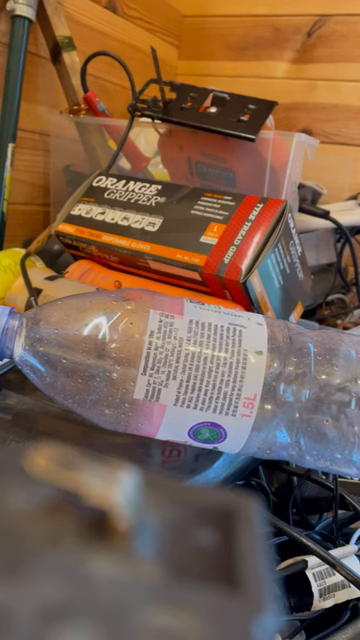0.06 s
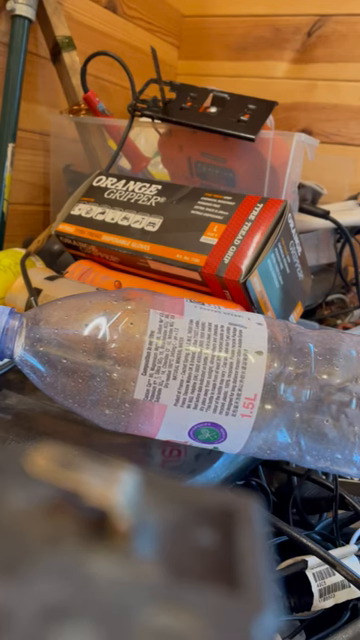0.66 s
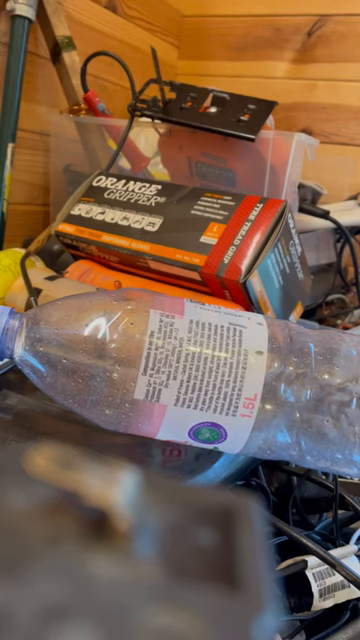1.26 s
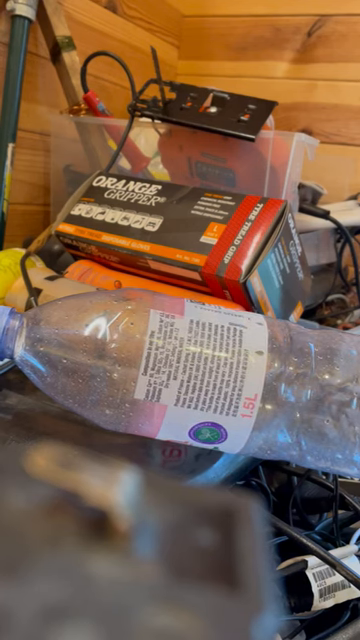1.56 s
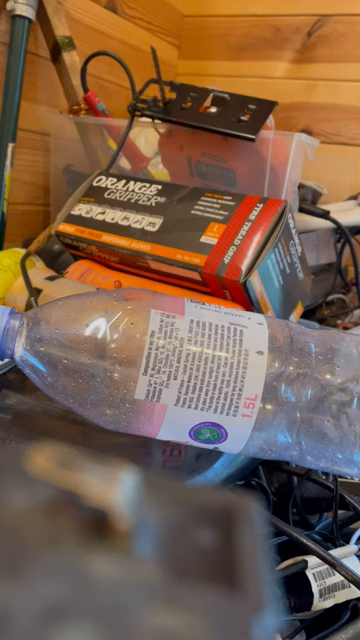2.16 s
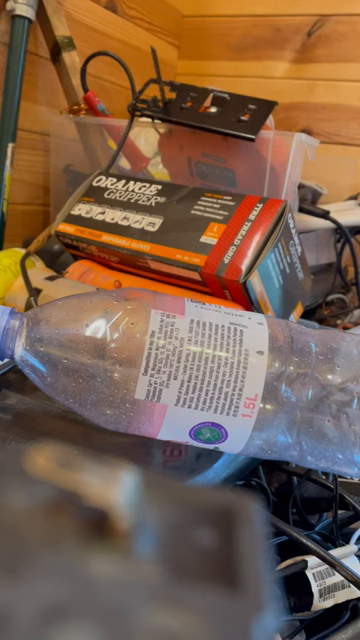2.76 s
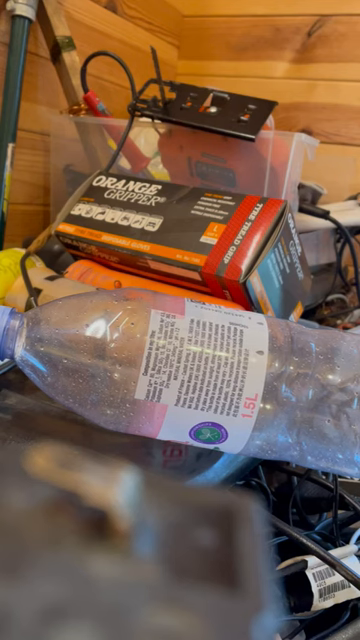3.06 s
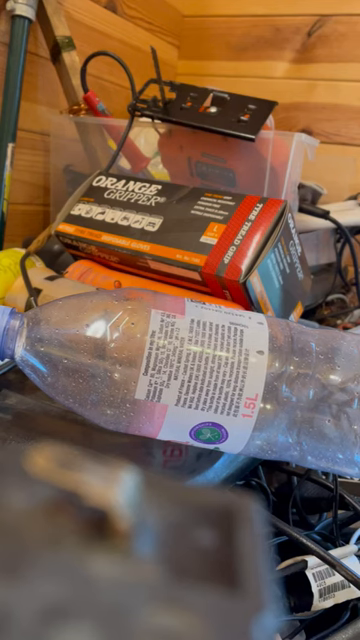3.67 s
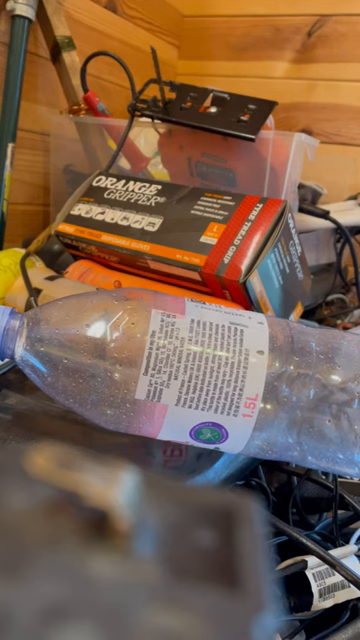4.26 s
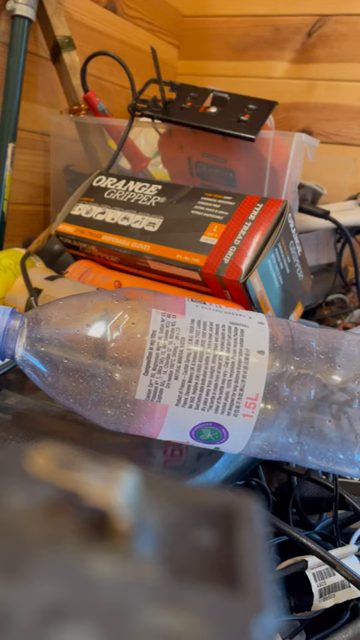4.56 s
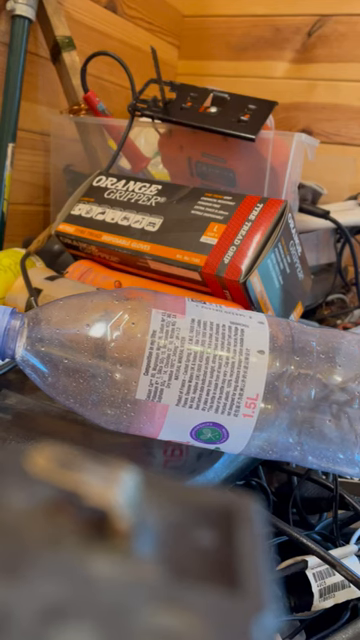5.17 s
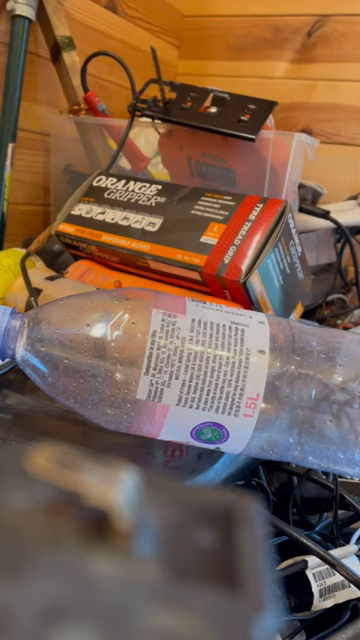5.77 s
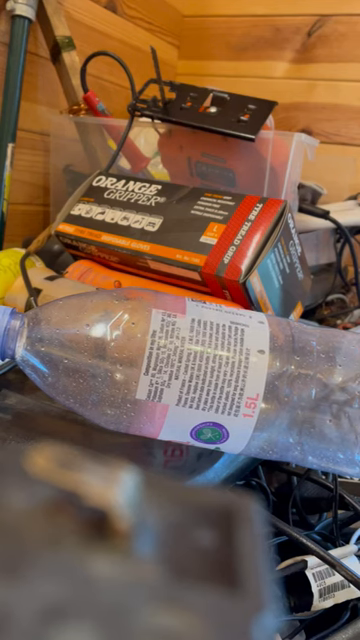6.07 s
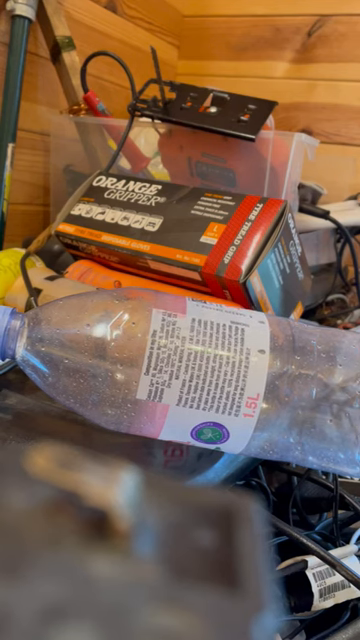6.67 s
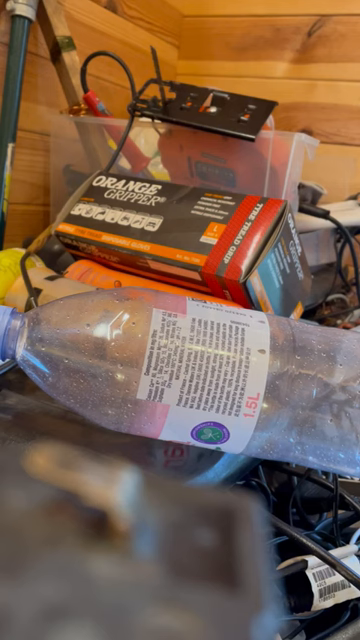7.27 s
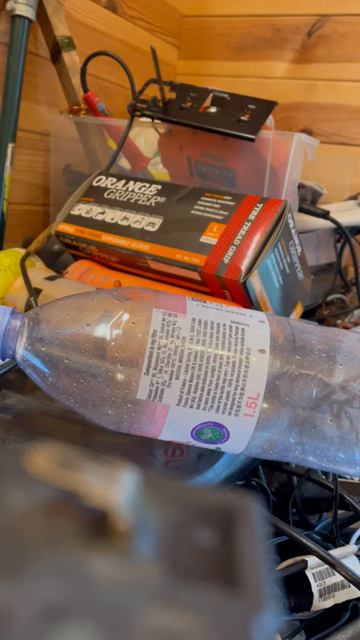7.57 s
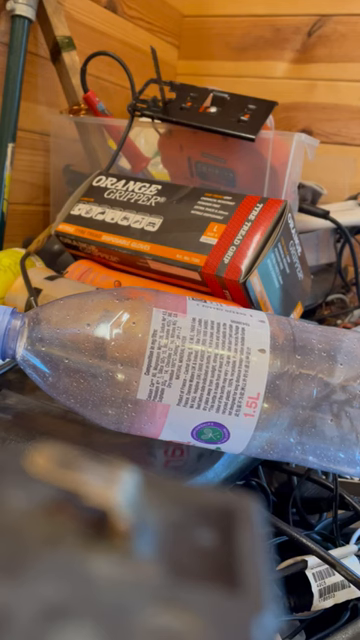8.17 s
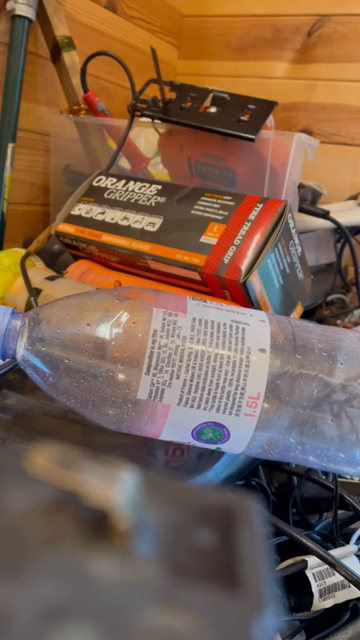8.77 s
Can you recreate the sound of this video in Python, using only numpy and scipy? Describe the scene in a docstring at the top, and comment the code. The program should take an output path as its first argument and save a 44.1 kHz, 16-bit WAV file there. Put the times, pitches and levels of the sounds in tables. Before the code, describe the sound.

A small compressor hums steadily with hissing air and a fine metallic rattle that eases as it pumps into a plastic bottle.

```python
"""Fridge compressor filling a bottle

A fridge compressor on a shed bench pumps air into a plastic bottle. Each piston stroke
thumps the casing and lets a spit of air through the fluttering valve, while loose parts chatter.
As the pressure builds the motor slows, the rush of air fades, and overtones slide into
the casing's narrow resonances and sing."""
import sys
import numpy as np
from scipy import signal
from scipy.fft import rfft, irfft, next_fast_len
from scipy.io import wavfile
from scipy.ndimage import uniform_filter1d, map_coordinates

SR = 44100
rng = np.random.default_rng(int(sys.argv[2]) if len(sys.argv) > 2 else 0)


def digitize_waveform(pressure):
    """Quantize a signal to 16-bit integers and store it at the path in sys.argv[1].

    Rows of a 2-D input are taken as channels; values are limited to [-1, 1].
    """
    field = np.atleast_2d(pressure).T
    bounded = np.clip(field, -1, 1)
    quanta = np.round(bounded * 32767).astype(np.int16)
    wavfile.write(sys.argv[1], SR, quanta)


N = 398223
TIME = np.arange(N) / SR
SIZE = next_fast_len(N + 8192, real=True)  # spare room for rings to die away
FREQ = np.maximum(np.arange(SIZE // 2 + 1) * SR / SIZE, 1)
FREE_HZ = 48.615  # motor turns per second while the bottle is empty


def undb(db):
    """Turn decibels into a number to multiply by."""
    return 10 ** (np.asarray(db) / 20)


def across(points):
    """Join (frequency, value) points into a curve over all frequencies."""
    hz, value = np.transpose(points)
    return np.interp(np.log(FREQ), np.log(hz), value)


def unit(x):
    """Scale a signal to an average power of 1."""
    return x / np.sqrt(np.mean(x ** 2))


def wander(rate_hz):
    """A smooth random wobble, about 1 in size."""
    hold = int(SR / rate_hz)
    steps = np.repeat(rng.standard_normal(N // hold + 1), hold)
    return unit(uniform_filter1d(steps, hold)[:N])


def ringing_filter(db):
    """A filter with these levels that rings only after it is struck."""
    cepstrum = irfft(np.log(undb(db)), SIZE)
    cepstrum[1:SIZE // 2] *= 2
    cepstrum[SIZE // 2 + 1:] = 0
    return np.exp(rfft(cepstrum))


def body(colour, rings=()):
    """An object as a filter: a broad tone colour plus peaks where it likes to ring."""
    peaks = sum((undb(db) ** 2 - 1) / (1 + (2 * (FREQ - hz) / width) ** 2) for hz, width, db in rings)
    return ringing_filter(across(colour) + 10 * np.log10(1 + peaks))


def opening(crank, position, half_length):
    """A smooth pulse once a turn; all three inputs are counted in turns."""
    distance = (crank - position + .5) % 1 - .5
    return np.exp(-(distance / half_length) ** 2)


# How far the left side runs ahead of the right: (frequency [Hz], lead [radians])
LEFT_LEAD = [(50, 0), (300, 0.42), (550, -1.56), (680, -0.84), (800, -3.5), (1000, 0.27), (2300, 0.11),
             (3600, 1.87), (4400, 0.5), (4900, 0.43), (6200, 1.61), (7000, 3), (8000, 3.5), (9000, 4),
             (9800, 8), (11600, 6.5), (12500, 8.5), (13200, 5), (14300, 8), (15000, 10)]

def stereo(spectrum):
    """Sound reaches the left and right microphones a little apart."""
    return irfft(spectrum * np.exp(np.array([[.5j], [-.5j]]) * across(LEFT_LEAD)), SIZE)[:, :N]


# How alike left and right are: (frequency [Hz], likeness [0-1])
SIDE_LIKENESS = [(100, 0.93), (400, 0.4), (1100, 0.04), (2000, 1), (3200, 0), (5500, 0.91), (7200, 1),
                 (8500, 1), (15000, 0.98)]

def shed_noise(noise, response):
    """Noise rings a body; the shed walls make the two sides differ."""
    direct, walls = rfft(noise, SIZE)
    alike = np.clip(across(SIDE_LIKENESS), 0, 1)
    both = direct * np.sqrt(1 + alike) + np.array([[1], [-1]]) * walls * np.sqrt(1 - alike)
    return stereo(both * response * np.sqrt(SR) / 2)


def turbulence(crank, repeat):
    """Hiss whose treble partly repeats every turn, as the same parts rub and slap."""
    one_turn = rng.standard_normal(int(SR / FREE_HZ))
    looped = unit(map_coordinates(one_turn, [crank * len(one_turn)], order=3, mode="grid-wrap"))
    share = repeat / (1 + (2500 / FREQ) ** 6)  # mostly above 2500 Hz
    fresh = rng.standard_normal((2, N))
    spectrum = np.sqrt(share) * rfft(looped, SIZE) + np.sqrt(1 - share) * rfft(fresh, SIZE)
    return irfft(spectrum, SIZE)[:, :N]


# Tone colour of the rotor: (frequency [Hz], level [dB per Hz])
WHIR_COLOUR = [(25, -98), (110, -88.5), (215, -96.5), (320, -91.5), (660, -92), (800, -103), (1500, -115)]

def whir():
    """The spinning rotor stirs a soft, even noise under the hum."""
    return shed_noise(rng.standard_normal((2, N)), body(WHIR_COLOUR))


# Faint ticks of the bottle: (time [s], level [dB])
BOTTLE_TICKS = [(4.581, -50), (7.617, -40)]

def ticks(decay_s=0.0017):
    """The stretching bottle wall gives way in tiny snaps."""
    envelope = sum(undb(db) * (TIME >= at) * np.exp(-np.abs(TIME - at) / decay_s)
                   for at, db in BOTTLE_TICKS)
    plastic = body([(800, -11), (3000, -20), (5500, -7), (9000, -6), (15000, -18)])
    plastic /= np.sqrt(np.mean(np.abs(plastic) ** 2) * SR / 2)
    return shed_noise(envelope * rng.standard_normal((2, N)), plastic)


# Swells of the casing's rocking: (time [s], half length [s], boost [dB])
CASING_LURCHES = [(0.1, .14, 3), (2.3, .45, 1.5), (4.3, 0.2, 6), (7.6, 0.32, 3), (8.92, .06, 2)]

def lurch_db():
    """The boost while the casing lurches and settles again."""
    return sum(db * np.exp(-((TIME - at) / length) ** 2) for at, length, db in CASING_LURCHES)


# Tone colour of the low shudder: (frequency [Hz], relative level [dB])
SHUDDER_TONE = [(18, -67), (34, -20), (43, -9.5), (57, 3.5), (68, -8), (88, -4), (112, -28.5), (170, -20),
                (300, -59)]

def shudder(steady_db=-63):
    """The casing rocks unevenly on its mounts and shakes the bench."""
    rumble = shed_noise(rng.standard_normal((2, N)), body(SHUDDER_TONE))
    return unit(rumble) * undb(steady_db + lurch_db())


# Soft bumps on the bench: (time [s], rough peak level [dB])
BENCH_BUMPS = [(0.079, -46), (0.268, -48), (0.552, -46), (0.955, -58), (1.251, -46), (1.759, -49),
               (2.024, -50), (2.32, -54), (2.56, -54), (2.64, -51), (4.277, -56), (4.343, -47),
               (4.473, -59), (5.296, -53), (6.147, -59), (6.994, -55), (7.428, -54), (7.607, -45),
               (8.28, -51), (8.868, -52)]

def bumps(pitch_hz=74, rise_s=0.01, detune=0.18):
    """Now and then the casing bumps the bench, which gives two or three low swings."""
    out = np.zeros(N)
    for (at, db), chance in zip(BENCH_BUMPS, rng.standard_normal(len(BENCH_BUMPS))):
        age = np.maximum(TIME - at, 0)
        envelope = undb(db) * age / rise_s * np.exp(1 - age / rise_s)
        out += envelope * np.sin(2 * np.pi * pitch_hz * (1 + detune * chance) * age)
    return signal.sosfilt(signal.butter(2, 40, "high", fs=SR, output="sos"), out)


# Tone colour of the air going in: (frequency [Hz], base level [dB per Hz])
RUSH_COLOUR = [(200, -115), (600, -101), (770, -96), (1000, -93), (1350, -100), (1800, -91), (2400, -88.5),
               (2750, -94), (4000, -94.5), (6000, -100), (15500, -114)]
# Dull rings of the pipe: (pitch [Hz], width [Hz], boost [dB])
PIPE_RINGS = [(1112, 30, 4), (1648, 16, 4), (2010, 110, 7), (2495, 50, 4), (2950, 50, 7), (3235, 35, 6),
              (3316, 24, 9)]

def rush(crank, load, fade_db=-4.0, throb=0.08, flicker_db=1.47):
    """Air drawn in rings the pipe; less flows against a full bottle."""
    pulse = unit(1 + throb * opening(crank, 0.66, 0.034))
    flow = pulse * undb(fade_db * (load - .5) + flicker_db * wander(40))
    return shed_noise(flow * turbulence(crank, repeat=0.13), body(RUSH_COLOUR, PIPE_RINGS))


# Tone colour of the leaking air: (frequency [Hz], base level [dB per Hz])
SIZZLE_COLOUR = [(1500, -112), (3000, -103), (4100, -100), (4700, -91.5), (5500, -94.5), (6400, -91),
                 (7000, -86.5), (7700, -104), (8350, -79.5), (9200, -106.5), (10000, -92.5), (11100, -92),
                 (11500, -87), (12200, -88), (12700, -88), (13400, -107), (14300, -96), (14850, -78.5),
                 (15500, -88)]
# High rings of the steel casing: (pitch [Hz], width [Hz], boost [dB])
CASING_RINGS = [(3715, 45, 11), (4107, 16, 10), (4368, 22, 13), (4445, 20, 7), (4484, 18, 14.5),
                (4540, 35, 8), (4630, 28, 9), (4705, 35, 5), (4785, 15, 7), (4830, 15, 7), (4990, 12, 7),
                (5022, 12, 7), (5218, 15, 7), (5330, 35, 10), (5700, 15, 6), (5889, 16, 9), (6090, 15, 5),
                (6182, 28, 14.5), (6270, 15, 6), (6388, 26, 13), (6582, 20, 7)]

def sizzle(crank, load, fade_db=-2.0, throb=0.35):
    """Squeezed air leaks and scours the steel casing, hardest at the top of the stroke."""
    leak = unit(1 + throb * opening(crank, 0.73, 0.13)) * undb(fade_db * (load - .5))
    return shed_noise(leak * turbulence(crank, repeat=0.15), body(SIZZLE_COLOUR, CASING_RINGS))


# Tone colour of the valve gear: (frequency [Hz], relative level [dB])
RASP_COLOUR = [(1200, -30.5), (1750, -16.5), (2040, -4.5), (2200, -4.5), (2480, -1), (2750, -17.5),
               (4000, -26.5)]

def rasp(crank, load, gain_db=-85.0, scatter_db=1.8, fade_db=-8):
    """The valve gear gives one short, dry rasp a turn, softer as the load presses it tight."""
    pulse = unit(opening(crank, 0.653, 0.14) * undb(scatter_db * wander(48)))
    envelope = pulse * undb(gain_db + fade_db * load)
    return shed_noise(envelope * rng.standard_normal((2, N)), body(RASP_COLOUR))


# Rings of loose pipe and casing parts: (pitch [Hz], width [Hz])
LOOSE_PARTS = [(1112, 10), (1648, 8), (2030, 22), (2495, 28), (2940, 10), (2968, 9)]
# How each of them tightens: (loose level [dB], tight level [dB], load that tightens it [0-1])
TIGHTENING = [(-69.5, -90, 1), (-69.5, -81, 0.8), (-61.5, -67, 0.78), (-63, -84, 0.83), (-66.5, -70.5, 0.4),
              (-66.5, -69.5, 0.54)]
# Moments when one part rings out: (time [s], half length [s], boost [dB], its pitch [Hz])
CHATTER_BOUTS = [(0.32, .09, 7, 2968), (0.4, 0.09, 6, 1648), (0.88, .1, 5, 2030), (0.91, 0.071, 8, 1648),
                 (1.72, .08, 5, 2968), (2.21, 0.087, 4, 1648), (2.5, .07, 4, 2940), (2.83, 0.064, 8, 1648),
                 (2.94, .08, 8, 2968), (3.11, 0.1, 6.5, 2030), (3.81, .1, 10, 1648), (4.486, .06, 6, 2030),
                 (4.6, 0.062, 12, 1648), (7.207, 0.076, 9, 2030)]

def chatter(crank, load, scatter_db=2.1, waver_db=0.6, jitter_s=0.00021, tighten_range=0.048):
    """Loose metal knocks once a turn, a little unevenly, and quietens as the load presses it tight."""
    strokes = np.flatnonzero(np.diff(np.floor(crank + .5)))[:-1]
    out = 0
    for (hz, width), (loose_db, tight_db, tight_load) in zip(LOOSE_PARTS, TIGHTENING):
        late, force = rng.standard_normal((len(strokes), 2)).T
        hits = np.clip(strokes + (late * jitter_s * SR).astype(int), 0, N - 1)
        knocks = np.zeros(N)
        knocks[hits] = undb(scatter_db * force)
        knocks *= undb(waver_db * wander(6.6))
        ring = 1 / (1 + 1j * (FREQ / hz - hz / FREQ) * hz / width)
        looseness = (1 - np.tanh((load - tight_load) / tighten_range / 2)) / 2
        bout_db = sum(db * np.exp(-((TIME - at) / length) ** 2)
                      for at, length, db, part_hz in CHATTER_BOUTS if part_hz == hz)
        level_db = tight_db + (loose_db - tight_db) * looseness + bout_db
        out += undb(level_db) * unit(stereo(rfft(knocks, SIZE) * ring))
    return out


# Narrow rings of the casing: (pitch [Hz], width [Hz])
SINGING_RINGS = [(1647, 4), (2030, 6), (2364.5, 6), (2605.5, 7)]
# How loud each sings when an overtone lands right on it: (level [dB])
SINGING_LEVELS = [-65.5, -64.5, -59, -58]

def singing(crank, speed, unsteadiness=(.4, .6, .09, .09)):
    """The slowing motor slides overtones across the casing's rings; each swells as it gets close."""
    out = 0
    for (hz, width), db, shake in zip(SINGING_RINGS, SINGING_LEVELS, unsteadiness):
        overtone = np.round(hz / speed.mean())
        waver = (1 + shake * (wander(16) + 1j * wander(16))) / np.sqrt(1 + 2 * shake ** 2)
        ring = waver / (1 + 2j * (overtone * speed - hz) / width)
        out += np.sqrt(2) * undb(db) * np.real(ring * np.exp(2j * np.pi * overtone * crank))
    return stereo(rfft(out, SIZE))


# Tone colour of a spit of air: (frequency [Hz], base level [dB per Hz])
SPIT_COLOUR = [(3000, -108), (5500, -96.5), (6200, -88), (7000, -91.5), (8100, -84), (9200, -99),
               (9900, -107), (10400, -89), (11050, -85), (11700, -83.5), (12350, -83.5), (12650, -90),
               (13300, -97), (13750, -82), (14200, -94), (14850, -82.5), (15600, -88)]
# Short rings of the valve plate: (pitch [Hz], width [Hz], boost [dB])
PLATE_RINGS = [(7990, 230, 10), (8350, 240, 8), (11310, 70, 12), (11440, 90, 13.5), (11730, 120, 9),
               (12000, 170, 10), (12290, 220, 6), (14560, 200, 8), (14868, 110, 12), (15090, 130, 7)]
# Openings in each turn: (position [turns], half length [turns], gain [dB], brightness [dB per octave])
VALVE_OPENINGS = [(0.765, 0.045, -3, -1.5), (0.895, 0.049, -2, 6), (0.995, 0.06, -8, 6)]

def valve(crank, scatter_db=0.9, jitter_turns=.004):
    """The springy valve snaps open twice a stroke and flutters shut, spitting air each time."""
    turn = np.floor(crank + .6).astype(int)  # counts up while the valve is shut
    octaves = np.log2(np.maximum(FREQ, 4000) / 11500)
    spits = 0
    for position, half_length, db, brightness in VALVE_OPENINGS:
        force, late = rng.standard_normal((turn[-1] + 1, 2))[turn].T
        flow = opening(crank, position + jitter_turns * late, half_length) * undb(db + scatter_db * force)
        spits += rfft(flow * turbulence(crank, repeat=0.24), SIZE) * undb(brightness * octaves)
    return shed_noise(irfft(spits, SIZE)[:, :N], body(SPIT_COLOUR, PLATE_RINGS))


# Overtones of the piston's thump:
# (multiple of motor speed, no-load level [dB], full-load level [dB], left minus right [dB])
HUM_OVERTONES = [(1, -55, -55.7, 0), (2, -63.2, -65.5, 0), (3, -66.2, -65.3, 0), (4, -66.8, -64.5, 0),
                 (5, -60, -62.8, -1), (6, -75, -58.7, 3), (7, -71, -62.9, 7), (8, -60, -60.7, -2),
                 (9, -69.7, -60.7, -2), (10, -67.2, -81, -1), (11, -75.5, -70.3, 2), (12, -63.9, -64.4, 0),
                 (13, -64.4, -58.3, -11), (14, -64.8, -62, -2), (15, -77.4, -73.0, 1), (16, -80, -83, 0),
                 (17, -73.8, -77.5, 7), (18, -76.5, -79, 0), (19, -71.8, -73.4, 1), (20, -74.8, -81.5, 0),
                 (21, -76.3, -74, 2), (23, -70.3, -83, 2), (24, -82, -92, 0), (26, -90, -88, 0)]

def hum(crank, pressure, load, waver_db=0.44, low_waver_db=1.0, strain_db=3.5, release_turns=.54):
    """The piston thumps once a turn: a stack of overtones whose balance shifts with the load."""
    rows = np.array(HUM_OVERTONES)
    hz = rows[:, 0] * FREE_HZ
    # the casing delays overtones near its resonances, so each thump rings on
    casing = body(np.c_[hz, rows[:, 1:3].mean(axis=1)])
    casing_phases = np.interp(hz, FREQ, np.angle(casing))
    out = 0
    for (k, idle_db, loaded_db, pan_db), casing_phase in zip(rows, casing_phases):
        size = undb(idle_db) * (1 - load) + undb(loaded_db) * load
        if k <= 2:  # the lowest two swell with each lurch
            size *= undb(low_waver_db * wander(14) + 0.8 * lurch_db())
        else:
            size *= undb(waver_db * wander(14))
        if k == 8:  # thins out partway through the filling
            size *= 1 - 0.75 * np.exp(-((pressure - .32) / 0.19) ** 2)
        if k == 14:  # a straining buzz close to full load
            size *= undb(strain_db * load ** 8)
        # the piston's slow push comes before the air is let out: low overtones lead, and it purrs
        purr_phase = 2.3 * max(7.5 - k, 0) ** 2
        early_turns = .065 * load if k <= 5 else 0  # rising pressure starts that push sooner
        phase = 2 * np.pi * k * (crank - release_turns + early_turns) + casing_phase - purr_phase
        pan = unit(undb(np.array([[pan_db], [-pan_db]]) / 2))
        out += np.sqrt(2) * size * np.cos(phase) * pan
    return stereo(rfft(out, SIZE))


def scene(fill_s=13.5, slowdown_hz=0.87, load_knee=0.28):
    """The filling bottle slows and loads one motor shaft, which sets the beat of the pump."""
    pressure = 1 - np.exp(-TIME / fill_s)  # 0-1: climbs fast at first, then more slowly
    speed = FREE_HZ - slowdown_hz * pressure
    load = 1 - np.exp(-(pressure / load_knee) ** 2)  # 0-1: how hard the pump works
    crank = np.cumsum(speed) / SR  # turns made so far
    machine = hum(crank, pressure, load) + singing(crank, speed)
    shaking = chatter(crank, load) + rasp(crank, load) + shudder() + bumps()
    air = whir() + rush(crank, load) + sizzle(crank, load) + valve(crank)
    return machine + shaking + air + ticks()


def record(dry, top_hz=15650):
    """The nearby phone cuts off the highest treble."""
    return signal.sosfilt(signal.ellip(10, .2, 70, top_hz, fs=SR, output="sos"), dry)


dry = scene()
out = record(dry)
digitize_waveform(out)
```